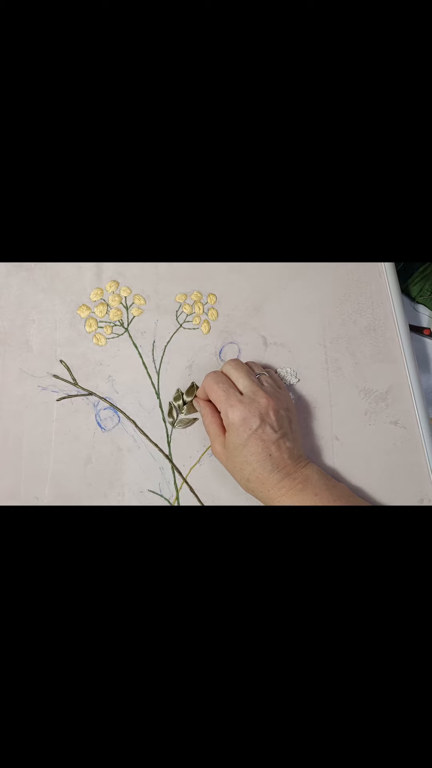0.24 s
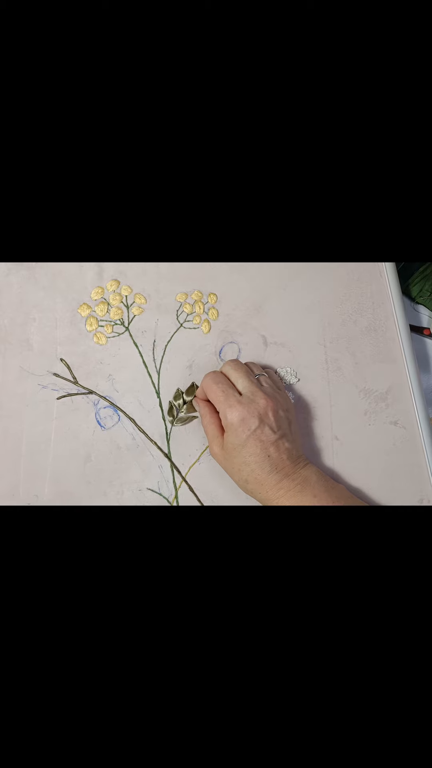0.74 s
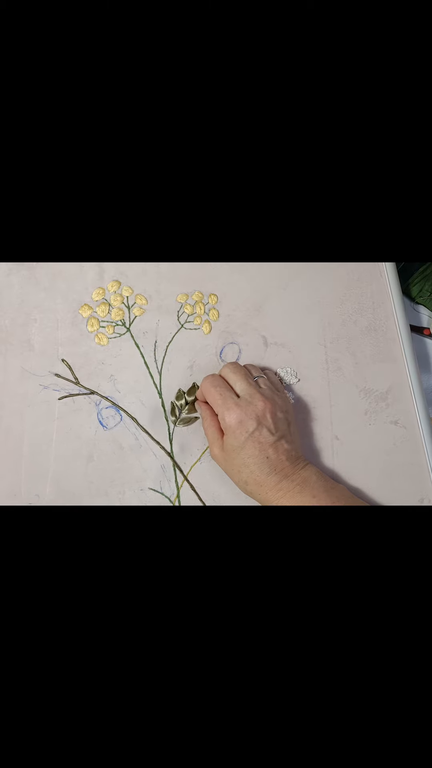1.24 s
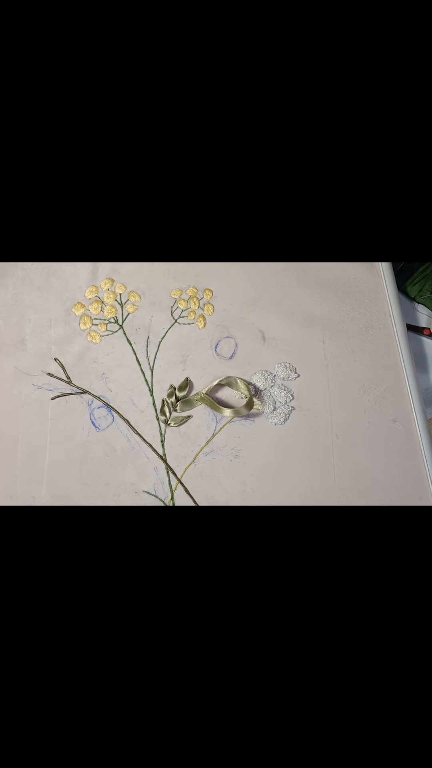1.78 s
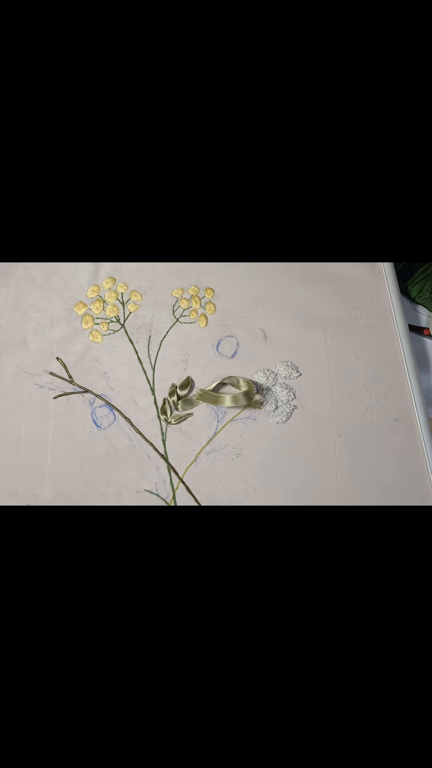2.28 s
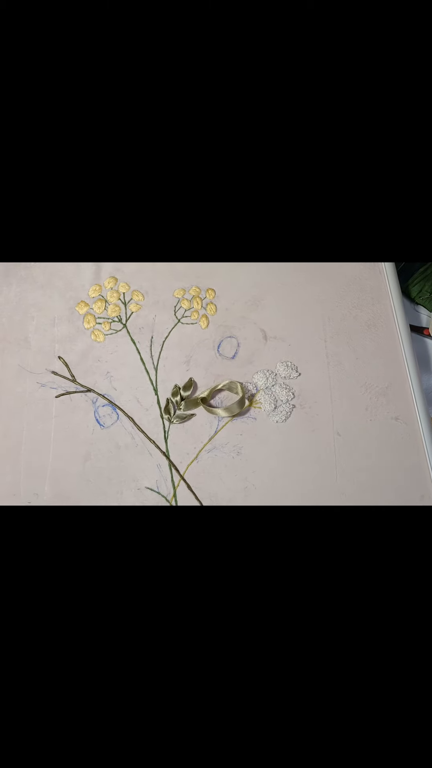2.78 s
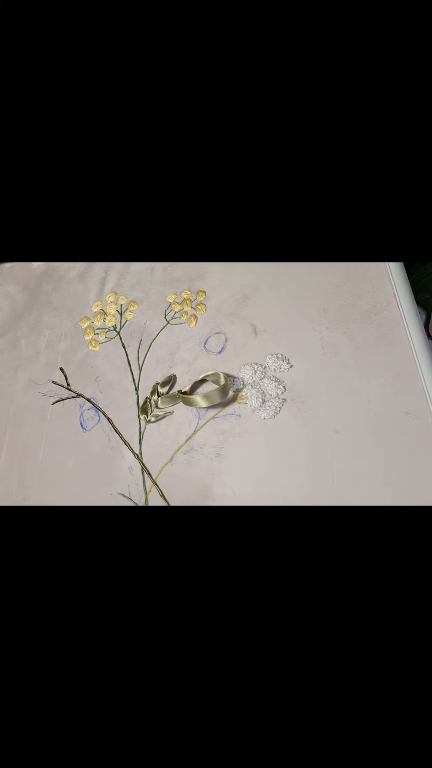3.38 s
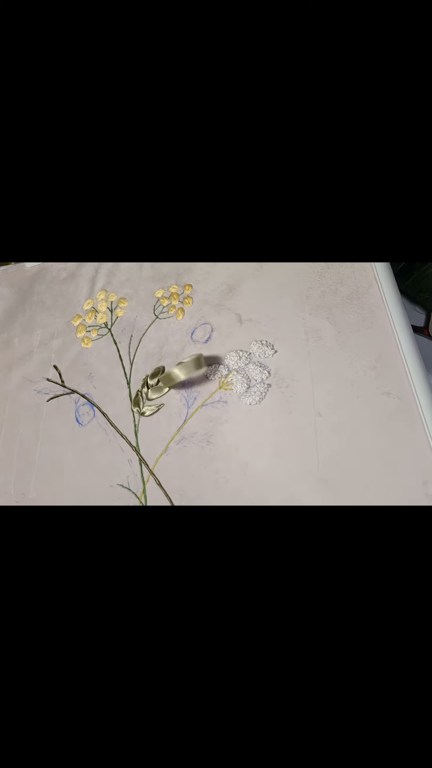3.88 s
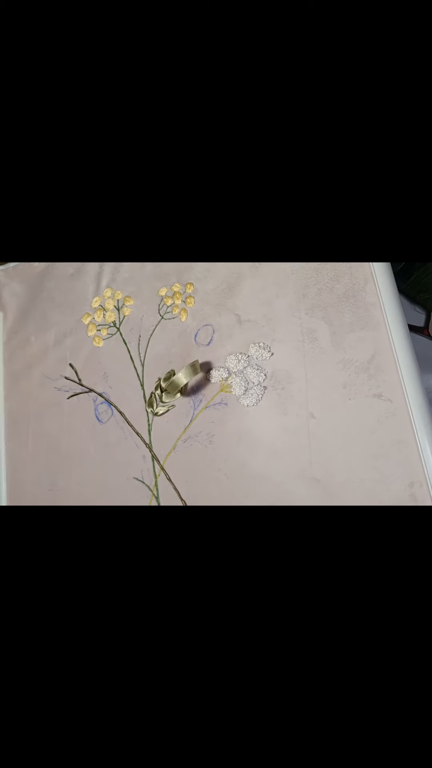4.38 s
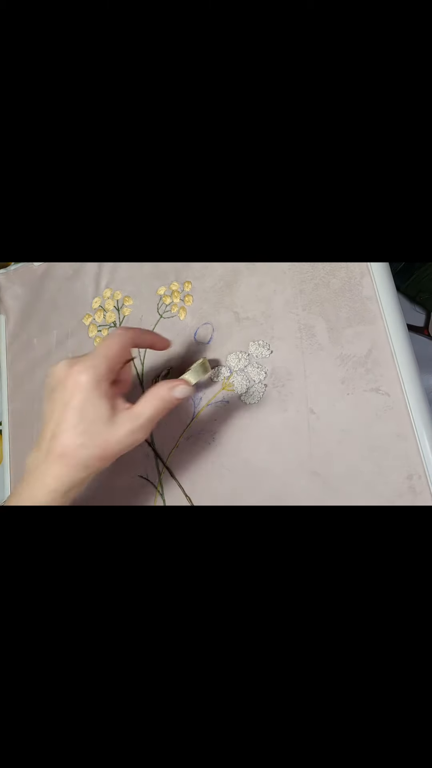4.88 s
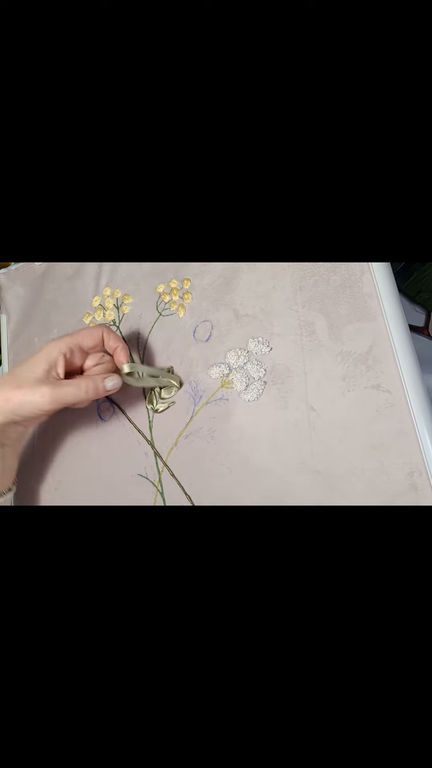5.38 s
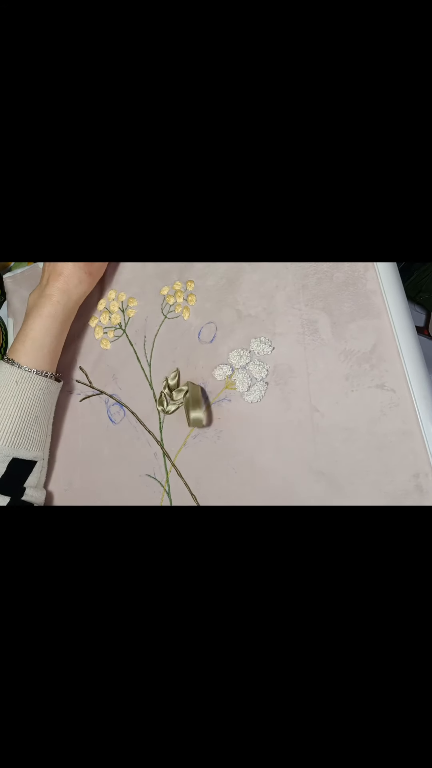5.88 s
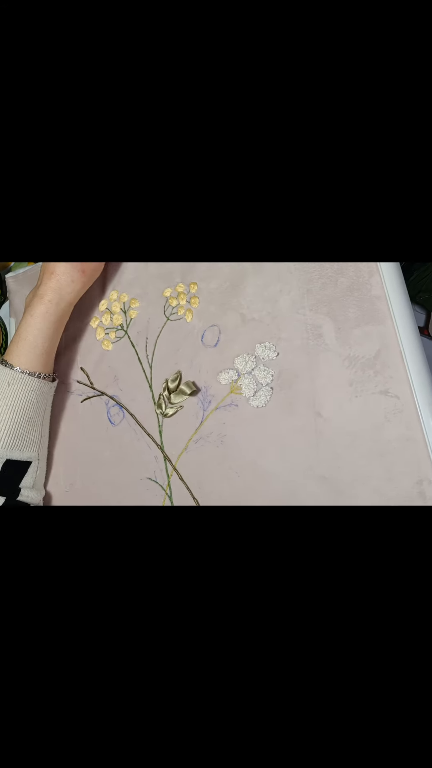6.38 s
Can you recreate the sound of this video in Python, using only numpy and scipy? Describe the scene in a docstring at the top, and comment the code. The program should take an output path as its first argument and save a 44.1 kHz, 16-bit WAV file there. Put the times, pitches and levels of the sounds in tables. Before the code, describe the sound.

Close, quiet embroidery: scattered sharp needle pops in stretched cloth, short ribbon rasps and a faint satin hiss.

```python
"""Ribbon embroidery, close up

Fabric stretched over a frame in a small quiet room, close to a stereo microphone and slightly right.
The needle pops and ticks through the weave; the ribbon rasps after it in stick-slip tugs and hisses
as it slides. The taut cloth answers every blow like a slack drum, and thuds when the ribbon pulls
tight or a hand touches it. Underneath lie the fingers, the rumble of the frame and the room tone."""
import sys
import numpy as np
from scipy import signal
from scipy.fft import rfft, irfft, next_fast_len
from scipy.io import wavfile
from scipy.ndimage import uniform_filter1d

SR = 44100
rng = np.random.default_rng(int(sys.argv[2]) if len(sys.argv) > 2 else 0)


def persist_wave(psi):
    """Save psi, clipped to +-1, as 16-bit WAV."""
    counts = np.round(np.clip(psi, -1, 1) * 32767).astype(np.int16)
    wavfile.write(sys.argv[1], SR, np.atleast_2d(counts).T)


N = 292868
TIME = np.arange(N) / SR
RING_TIME = TIME[:SR // 2]
LEFT_LAG_S, TOP_HZ = 0.0001, 15800

# Spectral shape of each sound: frequency_hz, gain_db
ROOM_SPECTRUM = [(20, -1), (100, -11), (300, -13), (1000, -18), (3000, -18.5), (8000, -27.5), (15000, -31)]
RUMBLE_SPECTRUM = [(20, 8.5), (45, -4.5), (80, -3), (160, -10), (400, -13), (800, -22), (2000, -37)]
RUSTLE_SPECTRUM = [(100, -4), (450, 6.5), (900, -0.5), (2000, -2.5), (3600, 0), (5200, -10.5), (9000, -33)]
HISS_SPECTRUM = [(1500, -31), (4000, -9.5), (5600, -9), (6600, -6), (7500, -1.5), (8500, -9),
                 (10000, -17.5), (15000, -21)]
PUFF_SPECTRUM = [(80, 8), (180, -7.5), (290, 13.5), (420, 1.5), (900, 1)]
RASP_SPECTRUM = [(50, -19.5), (180, -5), (330, -5.5), (550, 0), (850, -9), (1400, -18.5), (2200, -10.5),
                 (4200, -14.5), (5600, -19.5), (7700, -15.5), (10000, -33), (15000, -28.5)]
POP_SPECTRUM = [(30, -20.5), (110, -8), (290, -4), (560, 1.5), (760, -6.5), (1080, -7), (1550, -8),
                (1950, -13.5), (2650, -15), (3400, -17), (4600, -23), (5600, -20.5), (7500, -16.5),
                (10500, -42.5)]
# Left side of the microphone relative to the right: frequency_hz, gain_db
LEFT_BALANCE = [(200, -1.5), (600, -2), (1300, -.5), (2300, 1), (4400, -1.5), (15000, -0.5)]
# Drum modes of the stretched cloth: pitch_hz, level_db, t60_s
CLOTH_MODES = [(77.5, -7, 0.053), (103, -3.5, 0.22), (156, -15.5, 0.36), (230.6, -9.5, 0.58),
               (294.6, 0.5, 0.22), (386, 2, 0.085), (410, 5, 0.11), (482.4, -3.5, 0.23), (638, -3, 0.24),
               (904, -29, 0.24), (900, -1.5, 0.073), (1380, -7.5, 0.067), (1310, 2.5, 0.04),
               (1653, 17, 0.049), (2470, -4.5, 0.36)]
# How long cloth and room ring together: frequency_hz, t60_s
RING_DECAY = [(100, 0.36), (500, 0.18), (1500, 0.25), (4000, 0.23), (10000, 0.091)]
# Hollow resonances of the cloth in its frame: centre_hz, width_hz, boost_db
FRAME_RESONANCES = [(284, 89, 3.5), (500.4, 45, 2.5), (1042, 120, 4), (1340, 200, 4), (1650, 130, -1.5),
                    (2400, 160, 2.5), (4543, 600, 5.5)]
# The frame rocks as the hands shift their hold: middle_s, length_s, level_db
FRAME_ROCKS = [(1.393, .4, -58), (3.571, 0.26, -49.5), (6.097, 0.77, -59)]
# Satin sliding over the cloth: middle_s, length_s, hiss_db, rustle_db
RIBBON_STROKES = [(0.265, 0.24, -73, -89), (0.57, 0.074, -72.5, -80), (0.712, 0.23, -72, -73),
                  (0.935, 0.22, -65.5, -64.5), (1.127, 0.16, -65.5, -62.5), (1.283, 0.14, -66.5, -67.5),
                  (1.434, 0.39, -68.5, -65.5), (1.714, 0.2, -74, -92), (1.887, 0.05, -57.5, -56),
                  (2.55, 0.02, -60, -71), (3.112, 0.43, -72.5, -67), (3.469, 0.26, -66.5, -68.5),
                  (3.815, 1, -74, -70.5), (4.164, 0.55, -71.5, -70), (4.445, 0.22, -68, -64),
                  (4.785, 0.17, -74.5, -79.5), (5.103, 0.097, -69.5, -79.5), (5.347, 0.4, -71, -74.5),
                  (5.867, 0.51, -70, -67), (6.042, 0.19, -58.5, -69), (6.176, 0.13, -56, -62),
                  (6.357, 0.08, -61.5, -72), (6.503, 0.86, -72.5, -71.5)]
# Soft pushes on the cloth: start_s, strength_db, contact_s
CLOTH_PUSHES = [(0.721, -29.5, 0.018), (0.959, -18, 0.0046), (1.139, -20.5, 0.026), (1.433, -24.5, 0.0073),
                (1.859, -16, 0.0092), (1.8687, -10.5, 0.004), (1.876, -12.5, 0.00507), (2.547, -20, 0.0078),
                (2.705, -32, 0.0062), (3.141, -26.5, 0.0069), (3.486, -17, 0.012), (3.603, -19, 0.0076),
                (4.034, -26.5, 0.0043), (5.735, -27.5, 0.0055), (5.938, -21.5, 0.006),
                (6.189, -22.5, 0.013), (6.623, -23.5, 0.0044)]
# Ribbon dragged through its hole: start_s, peak_s, end_s, strength_db, brightness_db
RIBBON_TUGS = [(0.855, 0.876, 1.18, -64, -5), (1.346, 1.356, 1.479, -39, -5),
               (1.868, 1.871, 2.01, -57.5, 1.5), (2.363, 2.502, 2.62, -64, -10.5),
               (3.372, 3.415, 3.65, -58.5, -7), (3.49, 3.498, 3.55, -44.5, -5),
               (6.016, 6.028, 6.08, -50.5, 3), (6.116, 6.174, 6.24, -45.5, -8.5),
               (6.326, 6.353, 6.44, -53.5, -15), (6.441, 6.461, 6.76, -62.5, -12),
               (6.6, 6.623, 6.7, -59.5, -2)]
# Needle and ribbon catching in the weave; the last four columns shape the tone:
# start_s, strength_db, thump_db, snap_db, tick_db, sparkle_db
WEAVE_POPS = [(0.606, -34, 4, -16, -6, -4), (0.955, -18.5, 6, -6.5, 9, -1.5),
              (1.1223, -24.5, 10.5, -10, 9, -1), (1.3401, 3.5, -3.5, -3, 0, -3.5),
              (1.592, -17, 10.5, -3.5, 2, -8), (1.8434, -19, 9, -8.5, 18.5, 23.5),
              (2.488, -47, 8, -7, -10, -9), (2.5471, -21, 18, 4, -11, 6), (2.6926, -24, 8, -10, -5, -10),
              (3.024, -38, -2, -27, 6, -9), (3.47, -24, 4, 6, -4, -1), (3.4832, -7, 0.5, 7, 7, -7),
              (3.5048, -19, 16, -10, 16, -10), (3.5774, -10, 0.5, 5.5, 2, -8.5),
              (3.894, -36, 5, -10, 9, -4), (4.08, -26.5, 4.5, 2, -18, -5), (4.175, -31.5, 0, 1.5, -3, -10),
              (4.209, -30, 10, 2.5, -11, -6), (5.777, -23.5, 28, -30, -4, -6), (5.93, -21.5, 5, -11, 7, -5),
              (6.0461, -9, 4, -6.5, 5, 5.5), (6.126, -20.5, -16, -10, 5, 4), (6.183, -23, 6, 0, -3, 9),
              (6.319, -19.5, 2, -1, 1.5, -7), (6.548, -23.5, 18.5, -19, 5, -7)]


def undb(db):
    """Decibels to gain."""
    return 10 ** (np.asarray(db) / 20)


def unit(x):
    """Scale to unit energy per channel."""
    return x / np.sqrt(np.mean(np.sum(x ** 2, axis=-1)))


def level(x, db):
    """Scale to an rms level."""
    return x * undb(db) / np.sqrt(np.mean(x ** 2))


def along(hz, points):
    """Read (frequency_hz, value) points on a log-frequency axis."""
    point_hz, value = np.transpose(points)
    return np.interp(np.log(hz + 1e-3), np.log(point_hz), value)


def pulse(*spectra, size=4096):
    """The most compact causal pulse shaped by the sum of the given dB spectra."""
    hz = np.arange(size // 2 + 1) * SR / size
    cepstrum = irfft(np.log(undb(sum(along(hz, s) for s in spectra))))
    fold = 1 + np.sign(size // 2 - np.arange(size)) * 1.
    fold[0] = 1
    return unit(irfft(np.exp(rfft(cepstrum * fold))))


def through(x, response):
    """Convolve mono or stereo signals."""
    return signal.fftconvolve(np.atleast_2d(x), np.atleast_2d(response), axes=-1)


def add(out, start_s, x):
    """Mix x in from start_s on."""
    start = int(np.clip(start_s * SR, 0, N - 1))
    out[:, start:start + x.shape[1]] += x[:, :N - start]


def waver(rate_hz):
    """Random steps, smoothed twice, with an rms of 1."""
    hold = max(int(SR / rate_hz), 2)
    steps = np.repeat(rng.standard_normal(N // hold + 1), hold)[:N]
    return level(uniform_filter1d(uniform_filter1d(steps, hold), hold), 0)


def arch(middle_s, length_s):
    """A movement of the hand speeds up and slows down in half a sine."""
    return np.cos(np.pi * np.clip((TIME - middle_s) / max(length_s, .01), -.5, .5))


def direct(x):
    """A near sound reaches the right side of the microphone first."""
    hz = np.fft.rfftfreq(len(x), 1 / SR)
    left = irfft(rfft(x) * np.exp(-2j * np.pi * hz * LEFT_LAG_S), len(x))
    return np.array([left, x])


def diffuse(size, apart_hz=1500, bass_side=1.0):
    """White noise from all around; bass_side below 1 makes left and right alike in the bass."""
    length = next_fast_len(size, True)
    apart = np.minimum(bass_side + np.fft.rfftfreq(length, 1 / SR) / apart_hz, 1)
    mid, side = rfft(rng.standard_normal((2, length))) * [np.sqrt(2 - apart ** 2), apart]
    return level(irfft([mid + side, mid - side], length)[:, :size], 0)


def at_microphone(x):
    """Left and right hear the work with slightly different colours."""
    size = next_fast_len(N + len(RING_TIME), True)
    balance_db = along(np.fft.rfftfreq(size, 1 / SR), LEFT_BALANCE)
    return irfft(rfft(x, size) * undb([balance_db / 2, -balance_db / 2]), size)[:, :N]


def room_tone():
    """The steady hush of the room, all around the microphone."""
    return level(through(diffuse(N), pulse(ROOM_SPECTRUM))[:, :N], db=-71)


def rub(colour, gain, flutter_db, near_share):
    """Countless fibre contacts, wavering with the pressure of the hand."""
    around = diffuse(N)
    contacts = level(rng.laplace(size=next_fast_len(N, True)), 0)
    fibres = np.sqrt(1 - near_share) * around + np.sqrt(near_share) * direct(contacts)[:, :N]
    return level(through(fibres, colour)[:, :N], 0) * gain * undb(flutter_db * waver(rate_hz=45))


def handling(hiss_db=-84, rustle_db=-80, hold_db=-63):
    """Resting fingers hiss and rustle on the weave; the held frame rumbles, more when it rocks."""
    hiss = rub(pulse(HISS_SPECTRUM), undb(hiss_db), flutter_db=3.6, near_share=0.15)
    rustle = rub(pulse(RUSTLE_SPECTRUM), undb(rustle_db), flutter_db=4.2, near_share=0.15)
    rocking = sum(undb(db) * arch(middle_s, length_s) for middle_s, length_s, db in FRAME_ROCKS)
    rumble = rub(pulse(RUMBLE_SPECTRUM), undb(hold_db) + rocking, flutter_db=3.0, near_share=0.37)
    return hiss + rustle + rumble


def snags(hiss_gain, per_s=90, uneven_db=4, relative_db=-8):
    """Single fibres catch as the ribbon slides: a faint crackle that follows its hiss."""
    sizes = undb(uneven_db * np.minimum(rng.exponential(size=N), 3))
    caught = rng.random(N) < per_s / SR
    clicks = level(caught * sizes * rng.choice([-1, 1], N) + 1e-9, relative_db)
    crackle = through(clicks * hiss_gain, pulse(HISS_SPECTRUM))[0, :next_fast_len(N, True)]
    return direct(crackle)[:, :N]


def ribbon_strokes():
    """Smooth ribbon slides over the threads: the satin hisses and the cloth rustles with its speed."""
    hiss_gain, rustle_gain = 0, 0
    for middle_s, length_s, hiss_db, rustle_db in RIBBON_STROKES:
        speed = arch(middle_s, length_s)
        hiss_gain = np.hypot(hiss_gain, undb(hiss_db) * speed)
        rustle_gain = np.hypot(rustle_gain, undb(rustle_db) * speed)
    satin = pulse(HISS_SPECTRUM, [(7000, 0), (12000, 5)])  # extra fizz at the top
    sliding = rub(satin, hiss_gain, flutter_db=1.1, near_share=0.089) + snags(hiss_gain)
    return sliding + rub(pulse(RUSTLE_SPECTRUM), rustle_gain, flutter_db=2.4, near_share=0.15)


def cloth_modes(scatter_db=2):
    """The drum modes of the cloth; their balance varies at random from blow to blow."""
    hz, db, t60_s = np.transpose(CLOTH_MODES)[:, :, None]
    gain = undb(db + scatter_db * rng.standard_normal(db.shape))
    decay = np.exp(-np.log(1000) * RING_TIME / t60_s)
    return unit(np.sum(gain * np.cos(2 * np.pi * hz * RING_TIME) * decay, axis=0))


def ring(mode_db, build_s=0.00099):
    """Clear low modes inside a dense wash of high modes and wall reflections."""
    wash = rfft(diffuse(len(RING_TIME), apart_hz=1480, bass_side=0.34))
    hz = np.fft.rfftfreq(len(RING_TIME), 1 / SR)
    centres_hz, t60s = np.transpose(RING_DECAY)
    tail = 0
    for share, t60_s in zip(np.eye(len(centres_hz)), t60s):
        band = irfft(wash * along(hz, np.transpose([centres_hz, share])), len(RING_TIME))
        tail = tail + band * np.exp(-np.log(1000) * RING_TIME / t60_s)
    return unit(tail * (1 - np.exp(-RING_TIME / build_s))) + undb(mode_db) * direct(cloth_modes())


def hollow(x, gain_db=-1.0):
    """The resonances of the mounted cloth colour every crack and rasp."""
    hz = np.geomspace(50, TOP_HZ, 600)
    boost_db = sum(db / (1 + (2 * (hz - centre) / width) ** 2) for centre, width, db in FRAME_RESONANCES)
    return undb(gain_db) * through(x, pulse(np.transpose([hz, boost_db])))[:, :N]


def cloth_thuds(puff_db=-4, drum_db=-2, damping_s=0.085):
    """A smooth push moves the whole cloth and damps it; longer contact favours lower modes."""
    out = np.zeros((2, N))
    for start_s, db, contact_s in CLOTH_PUSHES:
        push = np.sin(np.pi * np.minimum(RING_TIME[:SR // 20] / contact_s, 1)) ** 2
        drum = through(push, cloth_modes() * np.exp(-RING_TIME / damping_s))[0]
        # the air follows the speed of the pushed cloth, rounded by the give of the weave
        puff = through(np.gradient(push), pulse(PUFF_SPECTRUM))[0]
        add(out, start_s, undb(db + puff_db) * direct(unit(puff)))
        add(out, start_s, undb(db + drum_db) * direct(unit(drum)))
    return out


def ribbon_tugs(slips_per_s=1500, uneven_db=3, direct_db=-3, ring_db=-3, damping_s=0.047):
    """The ribbon sticks and slips: dense uneven clicks ring the cloth, which the ribbon damps."""
    out = np.zeros((2, N))
    for start_s, peak_s, end_s, db, brightness_db in RIBBON_TUGS:
        t = np.arange(start_s, end_s, 1 / SR)
        pull = np.interp(t, [start_s, peak_s, end_s], [0, 1, 0])
        slipping = rng.random(len(t)) < slips_per_s / SR
        sizes = undb(uneven_db * np.minimum(rng.exponential(size=len(t)), 3))
        slips = level(slipping * sizes * rng.choice([-1, 1], len(t)) + 1e-9, db) * pull
        rasp = through(slips, pulse(RASP_SPECTRUM, [(700, 0), (5000, brightness_db)]))[0]
        damped_ring = ring(mode_db=-13.5) * np.exp(-RING_TIME / damping_s)
        add(out, start_s, undb(direct_db) * direct(rasp))
        add(out, start_s, undb(ring_db) * through(rasp, damped_ring))
    return out


def fibre_release(spread_s):
    """Fibres let go one after another within a few milliseconds, with no pitch of their own."""
    t = RING_TIME[:SR // 25]
    burst = rng.standard_normal(len(t)) * np.exp(-t / spread_s)
    spectrum = rfft(burst, 2 * len(t))
    return unit(irfft(spectrum / np.abs(spectrum))[:len(t)])


def weave_pops(base_release_s=0.0015, snap_doubling_db=20, medium_pop_db=-20.5):
    """The dented cloth springs back as a thread gives way: one short crack, then a duller ring."""
    out = np.zeros((2, N))
    for start_s, db, thump_db, snap_db, tick_db, sparkle_db in WEAVE_POPS:
        # steel on thread is bright, ribbon on cloth is dull and heavy
        contact = [(120, thump_db), (380, 0), (720, 0),
                   (1300, snap_db), (4000, tick_db), (7500, sparkle_db)]
        # more snap means more fibres and a longer release
        release = fibre_release(base_release_s * 2 ** (snap_db / snap_doubling_db))
        crack = unit(through(pulse(POP_SPECTRUM, contact), release))[0]
        add(out, start_s, undb(db) * direct(crack))
        softened = pulse(POP_SPECTRUM, contact, [(1300, 0), (4000, -3)])
        # hard pops are drier, and so are thumpy ones, where a finger pad rests on the cloth
        ring_db = -2.0 - 0.16 * (db - medium_pop_db) - 0.17 * thump_db
        add(out, start_s, undb(db + ring_db) * through(softened, ring(mode_db=-11)))
    return out


def scene():
    """The needlework, close and slightly to the right, over the room tone."""
    stitching = hollow(weave_pops() + ribbon_tugs())
    work = stitching + cloth_thuds() + ribbon_strokes() + handling()
    return at_microphone(work) + room_tone()


def record(dry):
    """The recorder cuts the top treble steeply."""
    return signal.sosfilt(signal.ellip(10, .1, 70, TOP_HZ, fs=SR, output="sos"), dry)


dry = scene()
out = record(dry)
persist_wave(out)
```